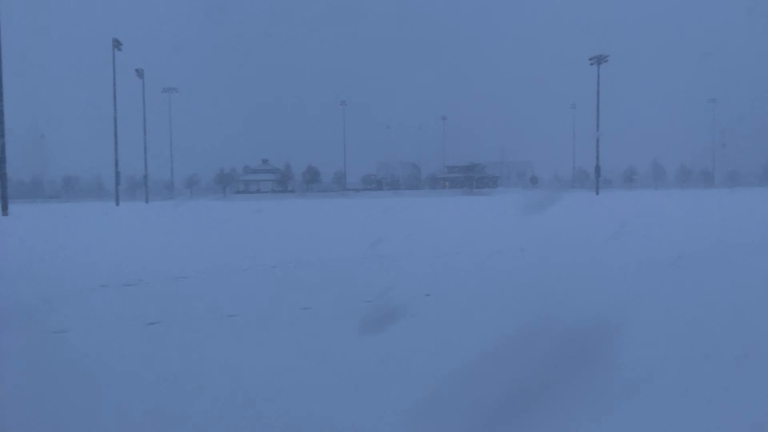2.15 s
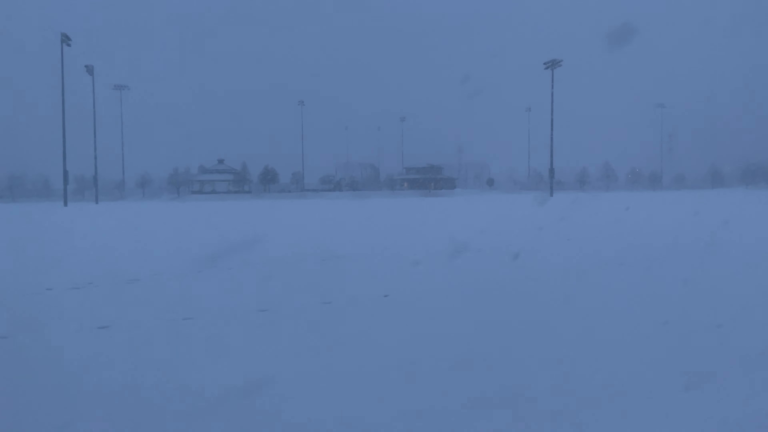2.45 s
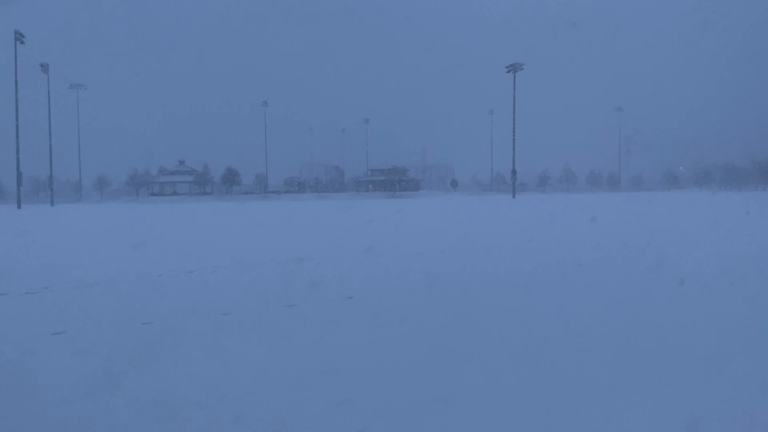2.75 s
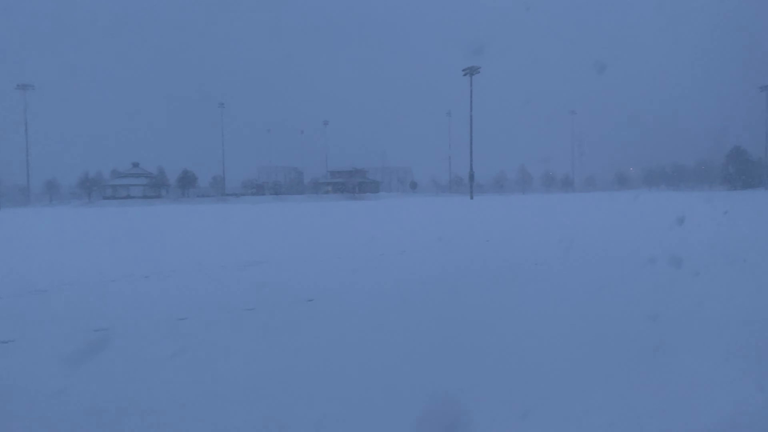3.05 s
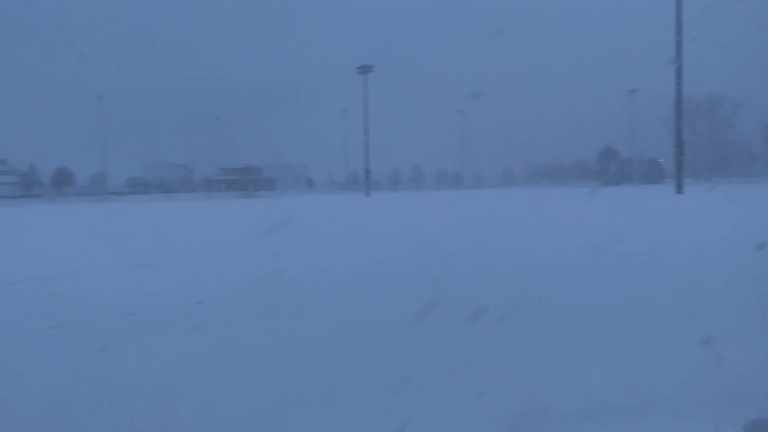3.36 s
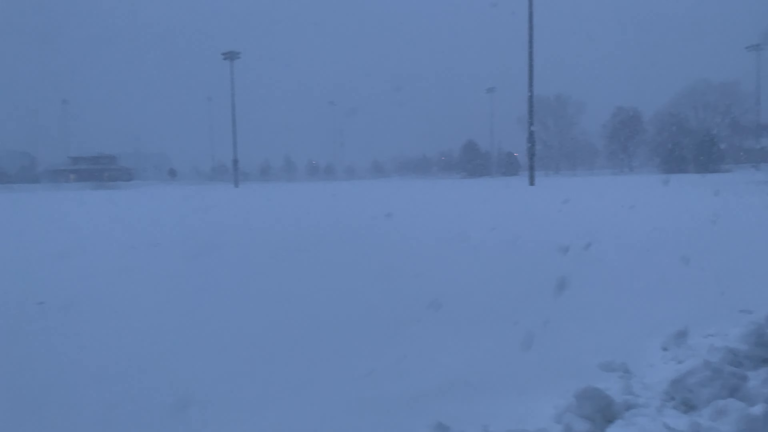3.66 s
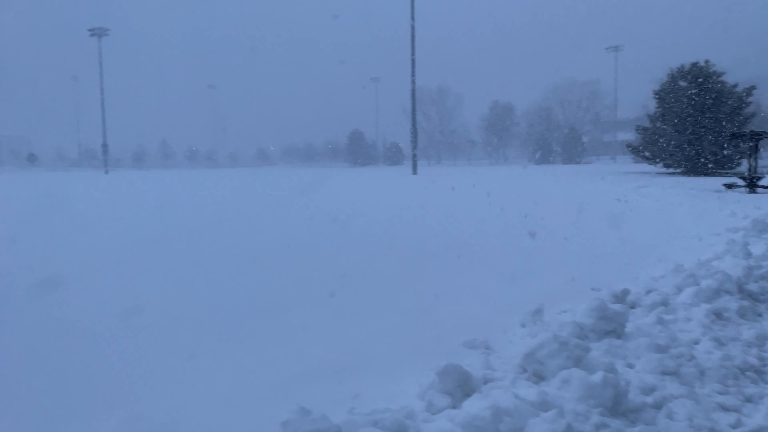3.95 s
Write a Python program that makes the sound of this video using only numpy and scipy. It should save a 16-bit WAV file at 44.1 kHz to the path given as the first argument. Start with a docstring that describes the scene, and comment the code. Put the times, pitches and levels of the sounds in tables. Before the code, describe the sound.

Wind buffets the microphone in an open snowy field for four seconds, opening with a thump and fluttering on as a low rumble. Behind it are a distant rush, a deep drone, a faint howl and hissing snow. Snow grains tick on the camera, louder from about 2.3 seconds, as the gusts thump more often. From 3.3 seconds wind swells in trees; two soft, hollow bumps come near 3.9.

```python
"""Wind buffets a microphone in an open, snowy park: eddies thump over a fluttering rumble.
Behind it are a broad rush of far wind, a deep drone (perhaps traffic), a faint howl round poles,
a whistle in twigs and the hiss of drifting snow, all shaped noise. Snow grains crack and ring on
the camera case, louder as it turns into the wind. Near the end, wind in trees swells and two soft,
hollow bumps sound."""
import sys
import numpy as np
from scipy import signal
from scipy.fft import rfft, irfft, next_fast_len
from scipy.io import wavfile
from scipy.ndimage import uniform_filter1d, map_coordinates

SR = 44100
rng = np.random.default_rng(int(sys.argv[2]) if len(sys.argv) > 2 else 0)


def materialize(psi):
    """Save the field psi as 16-bit PCM at rate SR to the path in sys.argv[1].

    A 1-D psi becomes a single channel; in a 2-D psi each row is a channel.
    """
    bounded = np.clip(np.atleast_2d(psi).T, -1, 1)
    quanta = np.round(bounded * 32767).astype(np.int16)
    wavfile.write(sys.argv[1], SR, quanta)


N = 176400

PORT_COHERENCE = [(60, 1), (110, 0.84), (200, 0.099), (400, 1), (1000, 0.12)]  # at the microphone ports: f/Hz, left-right coherence
PORT_LEAD = [(60, 0.35), (150, 0), (250, 0.18), (400, 0.93), (700, 1)]  # at the ports: f/Hz, left lead/rad
FIELD_COHERENCE = [(100, 1), (250, 0.64), (380, 0.12), (520, 0.048), (850, 0.87), (1150, 0.77),
                   (1600, 0.044), (3300, 0.34), (5000, 0.045)]  # sound from afar: f/Hz, left-right coherence
FIELD_LEAD = [(100, -1.2), (250, -0.9), (400, 1.0), (600, -2.08), (900, -1.67), (1150, -3), (1650, -2),
              (2200, -7.5), (2800, -9.5), (3400, -9.5), (4500, -13)]  # sound from afar: f/Hz, left lead/rad


def amp(db):
    """Decibels to gain."""
    return 10 ** (np.asarray(db) / 20)


def unit(x):
    """Scale to rms 1."""
    return x / np.sqrt(np.mean(x ** 2) + 1e-20)


def along(points, hz):
    """Interpolate (f/Hz, value) rows on a log axis."""
    f, v = np.transpose(points)
    return np.interp(np.log(hz + 1), np.log(f + 1), v)


def response(colour):
    """(f/Hz, gain/dB) rows as a gain function of frequency."""
    return lambda hz: amp(along(colour, hz))


def curve(rows):
    """Interpolate (t/s, value) rows per sample."""
    return np.interp(np.arange(N) / SR, *np.transpose(rows))


def wobble(knots_per_s):
    """Smooth random curve."""
    return map_coordinates(rng.standard_normal(2048), [np.arange(N) * knots_per_s / SR], mode="wrap")


def sides(pan_db):
    """Stereo gains; pan is left minus right."""
    pan_db = np.atleast_1d(pan_db)
    return amp(np.array([pan_db, -pan_db]) / 2)


def phase_split(lead, hz):
    """Stereo phase factors from (f/Hz, left lead/rad) rows."""
    return np.exp(.5j * np.outer([1, -1], along(lead, hz)))


def resonance(hz, width_oct):
    """Gain function of one peak."""
    return lambda f: 1 / (1 + (np.log2((f + 1) / hz) / width_oct) ** 2)


def filtered(x, gain):
    """Apply a gain function of frequency by FFT."""
    size = next_fast_len(N + 8192, True)
    return irfft(rfft(x, size) * gain(np.fft.rfftfreq(size, 1 / SR)), size)[..., :N]


def air(gain, coherence, lead):
    """Stereo noise, rms 1, of given colour, coherence and phase lead."""
    def mid_side_gain(hz):
        angle = np.arccos(np.clip(along(coherence, hz), -1, 1)) / 2
        return gain(hz) * [np.cos(angle), np.sin(angle)]
    mid, side = filtered(rng.standard_normal((2, N)), mid_side_gain)
    return unit(filtered(np.array([mid + side, mid - side]), lambda hz: phase_split(lead, hz)))


def field_noise(colour, pan, coherence, lead, patch_db):
    """Distant noise; patches of its spectrum swell and fade."""
    spectra = signal.stft(air(response(colour), coherence, lead), nperseg=1024)[2]
    patches = uniform_filter1d(rng.standard_normal(spectra.shape[1:]), size=7, axis=0)
    patches = unit(uniform_filter1d(patches, size=14, axis=1))
    noise = signal.istft(spectra * amp(patch_db * patches), nperseg=1024)[1][:, :N]
    return filtered(noise, lambda hz: sides(along(pan, hz)))


def puff(centre_s, length_s, db, gain):
    """Noise burst under a Gaussian envelope."""
    bell = np.exp(-2 * ((np.arange(N) / SR - centre_s) / length_s) ** 2)
    burst = unit(bell * air(gain, PORT_COHERENCE, PORT_LEAD))
    return amp(db) * burst * np.sqrt(np.mean(bell ** 2))


def drone():
    """Narrow, deep rumble, perhaps far traffic."""
    level = [(0, -47.5), (1.5, -62), (2.2, -58), (2.7, -51.5), (3.3, -44.5), (4.0, -45.5)]  # t/s, level/dB
    return amp(curve(level)) * air(resonance(hz=64.7, width_oct=0.19), PORT_COHERENCE, PORT_LEAD)


def far_rush():
    """Steady roar of wind over the open field."""
    level = [(0, -52), (.3, -53), (.6, -52.5), (1.0, -53), (1.55, -51), (1.9, -51), (2.2, -50),
             (2.6, -51.5), (3.15, -49.5), (3.45, -51), (4.0, -53.5)]  # t/s, relative level/dB
    colour = [(30, -9), (100, -6), (250, 2.5), (450, -2.5), (650, 1.5), (850, 0), (1150, -3), (1600, -5),
              (2100, -15.5), (2800, -21), (4000, -34), (7000, -76), (14000, -81)]  # f/Hz, gain/dB
    pan = [(130, 6), (350, -1), (600, -1.5), (1100, -1), (1700, 3), (2300, 0.5), (3000, 12), (5000, 7)]  # f/Hz, pan/dB
    return amp(curve(level) + 5) * field_noise(colour, pan, FIELD_COHERENCE, FIELD_LEAD, patch_db=1.04)


def trees():
    """Wind in nearby trees: a brighter rush grows as the camera turns to them."""
    level = [(0, -115), (2.9, -89), (3.3, -64), (3.65, -54), (3.85, -49.5), (4.0, -51)]  # t/s, relative level/dB
    colour = [(200, -20), (500, -46), (820, 19.5), (1050, 11.5), (1350, 13), (1700, -24), (2150, 7.5),
              (2700, 3), (3200, -6), (3900, -17), (6000, -38), (12000, -60)]  # f/Hz, gain/dB
    pan = [(1000, -1), (1800, -15), (2150, 15), (2700, -8), (3200, 9), (5000, 21)]  # f/Hz, pan/dB
    left_lead_s = 0.001414
    lead = [(hz, 2 * np.pi * hz * left_lead_s) for hz in range(0, SR // 2, 100)]
    return amp(curve(level)) * field_noise(colour, pan, coherence=[(1, 0.36)], lead=lead, patch_db=3.5)


def wind_tone(track, half_width_hz, pan_db):
    """Narrow noise band gliding along a pitch and level track."""
    s, hz, db = np.transpose(track)
    a, b = filtered(rng.standard_normal((2, 2, N)), lambda f: 1 / (1 + (f / half_width_hz) ** 4))
    phase = 2 * np.pi * np.cumsum(curve(np.c_[s, hz])) / SR
    band = unit(a * np.cos(phase) + b * np.sin(phase))
    return amp(curve(np.c_[s, db])) * sides(pan_db) * band


def howls():
    """Wind howls round poles and whistles in twigs; pitch goes with wind speed."""
    poles = [(0, 1600, -86), (.55, 1908, -63), (1.0, 1640, -70), (1.35, 1667, -60), (1.48, 1618, -64),
             (1.55, 1485, -54), (1.62, 1516, -73), (1.75, 1707, -65), (2.0, 1682, -65), (2.3, 1510, -75),
             (2.8, 1536, -72), (3.15, 1836, -58), (3.5, 1727, -57), (4.0, 1770, -63)]  # t/s, f/Hz, level/dB
    twigs = [(0, 2500, -68), (.5, 2950, -68.5), (.9, 2600, -82), (3.3, 2900, -109), (3.65, 3000, -64.5),
             (3.85, 3130, -61), (4.0, 3150, -63)]  # t/s, f/Hz, level/dB
    return wind_tone(poles, half_width_hz=95, pan_db=2) + wind_tone(twigs, half_width_hz=230, pan_db=-5)


def drift():
    """Blown snow hissing in slow swells."""
    level = [(0, -64.5), (.25, -66), (.55, -59.5), (.9, -65.5), (1.1, -65), (1.37, -63.5), (1.8, -64.5),
             (2.3, -64.5), (2.72, -65.5), (3.05, -65.5), (3.5, -62), (4.0, -61)]  # t/s, relative level/dB
    colour = [(300, -78), (1200, 10), (2100, 12.5), (3000, -0.5), (4000, -15.5), (6000, -42), (9500, -26),
              (11500, -30), (13000, -54), (14500, -22), (16000, -35)]  # f/Hz, gain/dB
    pan = [(1500, 4.5), (2200, 1.5), (3200, -5), (5000, -11), (9000, 11)]  # f/Hz, pan/dB
    return amp(curve(level) + 5.5) * field_noise(colour, pan, FIELD_COHERENCE, FIELD_LEAD, patch_db=2.7)


def spray():
    """Fine snow spray in the gusts, to the right."""
    level = [(0, -69), (.15, -70), (.24, -73), (.33, -70.5), (.46, -65), (.6, -65.5), (.75, -72.5),
             (.93, -72), (1.05, -72.5), (1.45, -68.5), (1.62, -72.5), (1.87, -72), (2.08, -72.5),
             (2.3, -71.5), (2.75, -70), (2.95, -74.5), (3.3, -68), (4.0, -67)]  # t/s, level/dB
    colour = [(2000, -1), (3500, 5), (4500, -1.5), (6000, -6), (9500, -17.5), (13000, -55)]  # f/Hz, gain/dB
    return amp(curve(level)) * sides(pan_db=-10) * air(response(colour), FIELD_COHERENCE, FIELD_LEAD)


def bumps():
    """Two soft, hollow bumps, perhaps a hand on the camera."""
    events = [(3.858, .017, -38, 560), (3.891, .011, -43, 520)]  # t/s, length/s, level/dB, f/Hz
    return sum(puff(s, length_s, db, resonance(hz, width_oct=0.18)) for s, length_s, db, hz in events)


def case_strikes(onset_s, db, hz, pan_db, ring_t60_s, crack_gain):
    """Each grain cracks and rings briefly; the case carries it to both ports."""
    colour = [(300, -15), (1500, 13), (3000, 11.5), (5000, 3), (7000, 3.5), (9700, 3.5), (11500, -6.5),
              (13000, -26), (14700, -5), (16000, -8)]  # case path: f/Hz, gain/dB
    lead = [(3000, 1.5), (6000, 1.36), (9000, -5), (10800, -3), (12800, -24), (14800, -18.5)]  # f/Hz, left lead/rad
    crack_t60_s = .011
    t = np.arange(SR // 125) / SR
    ring = np.sin(2 * np.pi * hz[:, None] * t) * amp(-60 * t / ring_t60_s[:, None])
    crack = crack_gain * rng.standard_normal(ring.shape) * amp(-60 * t / crack_t60_s)
    grains = (ring + crack) * (sides(pan_db) * amp(db))[..., None]
    index = (onset_s * SR).astype(int)[:, None] + np.arange(len(t))
    hits = np.array([np.bincount(index.ravel(), channel.ravel(), N)[:N] for channel in grains])
    return filtered(hits, lambda f: amp(along(colour, f)) * phase_split(lead, f))


def large_grains():
    """Large snow grains tick on the case, each bursting into three fragments."""
    ticks = [(.11, -61, 7000, -4), (.12, -49.5, 14500, -4), (.165, -54, 7600, -5), (.323, -58, 5800, -14),
             (0.364, -60, 8950, -5), (.43, -55.5, 5060, -11), (.579, -49.5, 8300, -2),
             (.6754, -55, 9100, 11), (.7547, -50, 14500, 0), (.768, -53, 14500, -2),
             (1.003, -58.5, 4780, -6), (1.175, -54, 5240, -5), (1.2423, -51, 8300, 3),
             (1.3597, -55, 5490, -4), (1.393, -56, 8300, -7), (1.532, -54, 5000, -4), (1.636, -51, 8640, 0),
             (1.7107, -54, 5500, -7), (1.88, -57, 5560, -7.5), (1.954, -57, 9800, 2),
             (2.1508, -57.5, 5200, -7), (2.269, -52.5, 5230, -12), (2.368, -57, 14460, 6),
             (2.4728, -48, 8900, 9), (2.6395, -45.5, 5860, -7.5), (2.695, -47, 5450, -3),
             (2.7314, -57, 6000, -4.5), (2.7543, -43, 5100, -2), (2.766, -50, 5600, -5),
             (2.8222, -51, 9240, 4), (2.883, -52.5, 5040, -13), (3.1283, -45, 7460, 11),
             (3.1665, -42.5, 8630, 14), (3.3996, -46, 2820, 7), (3.5172, -40, 9690, 16),
             (3.5936, -41, 8800, 5.5), (3.604, -56, 9300, 14), (3.681, -50, 7140, -11),
             (3.698, -47, 8900, 6), (3.876, -54, 4570, 10), (3.892, -49.5, 8250, 11)]  # t/s, relative level/dB, ring f/Hz, pan/dB
    s, db, hz, pan_db = np.transpose(ticks)
    db = db - 6.5
    t60_s, crack_gain, scatter_s = np.full(len(s), 0.0074), .85, .008
    fragment_db = np.minimum(db - 3, -61)
    out = case_strikes(s, db, hz, pan_db, t60_s, crack_gain)
    for _ in range(3):
        delay, detune = rng.uniform(size=(len(s), 2)).T
        fragment_hz = hz * 2 ** ((detune - .5) / 2)
        out += case_strikes(s + scatter_s * delay, fragment_db, fragment_hz, pan_db, t60_s, crack_gain)
    return out


def fine_grains():
    """Fine snow patters on the case in flurries; higher grains lean left."""
    level = [(0, -77), (.7, -75), (.95, -75), (1.38, -72.5), (1.7, -72.5), (2.08, -81.5), (2.3, -64.5),
             (2.47, -63.5), (2.57, -66.5), (2.75, -67), (2.98, -67.5), (3.2, -60.5), (3.6, -64.5),
             (3.85, -62.5), (4.0, -63.5)]  # t/s, level/dB
    grains_per_s, spread_db, flurry_db, t60_cycles = 780, 7.5, 1.3, 26
    count = int(grains_per_s * N / SR)
    flurries = amp(flurry_db * wobble(knots_per_s=30))
    size, pitch, side = np.clip(rng.standard_normal((count, 3)), -2, 2).T
    hz = 7040 * np.exp(.35 * pitch)
    pan_db = 33 * np.tanh(side + pitch)
    onset_s = rng.uniform(0, N / SR, count)
    patter = case_strikes(onset_s, spread_db * size, hz, pan_db, t60_cycles / hz, crack_gain=.9)
    return amp(curve(level)) * unit(patter * flurries)


def buffeting():
    """Turbulence at the microphone: fluttering rumble plus thumps of single eddies."""
    level = [(0, -28), (.12, -47.5), (.38, -47), (.51, -46), (.58, -39.5), (.87, -40.5), (1.05, -40.5),
             (1.22, -42), (1.35, -46), (1.52, -48.5), (1.65, -45.5), (2.0, -45.5), (2.18, -40.5),
             (2.3, -45), (2.5, -44), (2.72, -43.5), (3.07, -39), (3.3, -44), (3.55, -38.5), (3.72, -40.5),
             (3.82, -45.5), (4.0, -63)]  # t/s, level/dB
    colour = [(15, -44), (30, -7), (42, -9), (56, 0), (80, -4.5), (130, -4), (250, -11), (400, -16.5),
              (700, -39.5), (2000, -73), (6000, -120)]  # f/Hz, gain/dB
    eddies = [(.005, 0.043, -33, 192), (0.261, 0.056, -37.5, 126), (0.59, 0.017, -36, 280),
              (0.635, 0.021, -34.5, 129), (0.782, 0.019, -33, 112), (1.663, 0.04, -42.5, 200),
              (1.763, 0.03, -41, 151.3), (1.873, 0.076, -41, 171), (2.397, 0.03, -34, 157),
              (2.609, 0.036, -32, 170), (2.84, 0.1, -36, 240), (2.944, 0.036, -30, 243),
              (2.965, 0.032, -31.5, 356), (2.988, 0.012, -25.5, 355), (3.158, 0.019, -29.5, 275),
              (3.536, 0.016, -29.5, 337.6), (3.582, 0.0073, -31, 342), (3.634, 0.028, -29, 343),
              (3.698, 0.019, -30, 197)]  # t/s, length/s, level/dB, upper edge f/Hz
    flutter_db, low_edge_hz, rolloff_order = 2.6, 46, 4.7
    flutter = amp(flutter_db * wobble(knots_per_s=35))
    rumble = air(response(colour), PORT_COHERENCE, PORT_LEAD)
    out = amp(curve(level)) * unit(flutter * rumble)
    for s, length_s, db, edge_hz in eddies:
        band = lambda hz: (1 - np.exp(-(hz / low_edge_hz) ** 4)) / (1 + (hz / edge_hz) ** rolloff_order)
        out += puff(s, length_s, db, band)
    return out


def scene():
    """Sum at the two microphone ports."""
    wind = howls() + buffeting() + drone() + far_rush() + drift() + spray() + trees()
    return wind + bumps() + large_grains() + fine_grains()


def record(dry):
    """The camera's band limit."""
    return filtered(dry, lambda hz: hz < 15850)


dry = scene()
out = record(dry)
materialize(out)
```